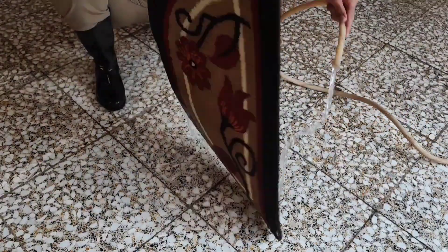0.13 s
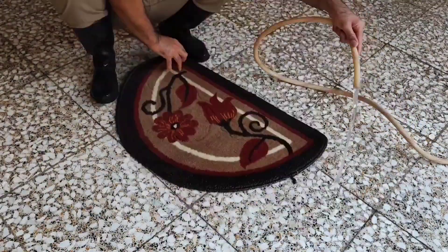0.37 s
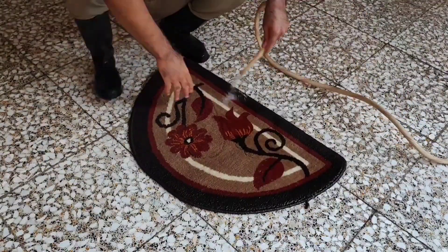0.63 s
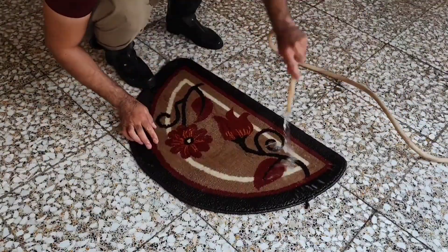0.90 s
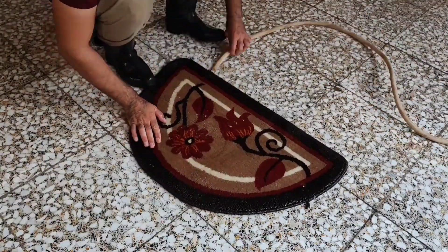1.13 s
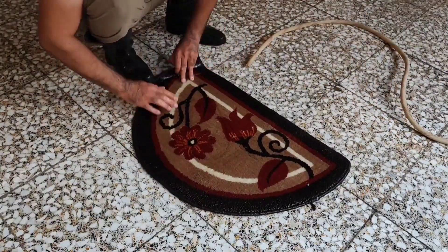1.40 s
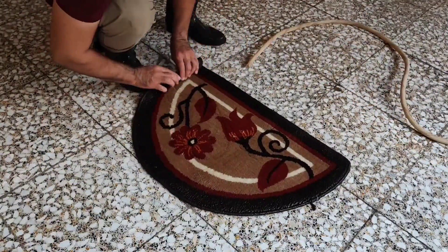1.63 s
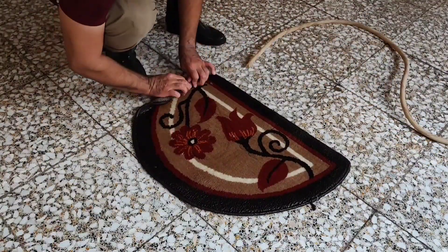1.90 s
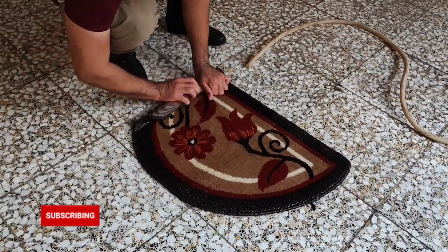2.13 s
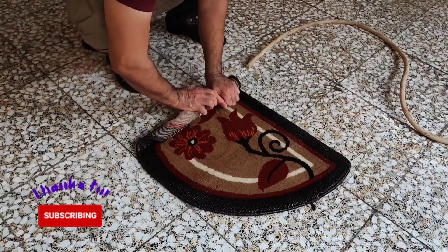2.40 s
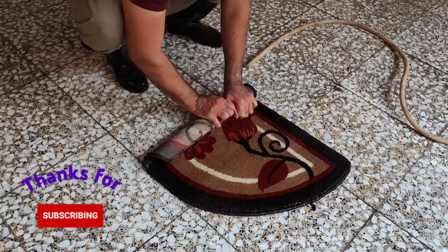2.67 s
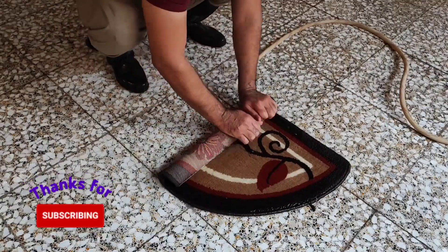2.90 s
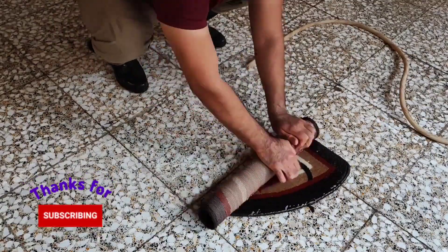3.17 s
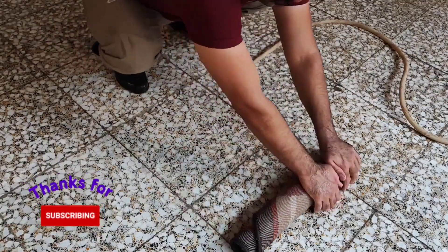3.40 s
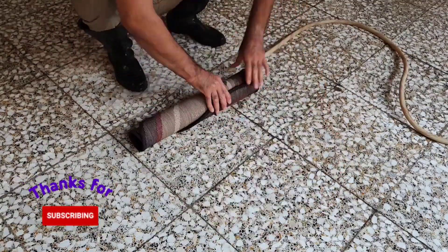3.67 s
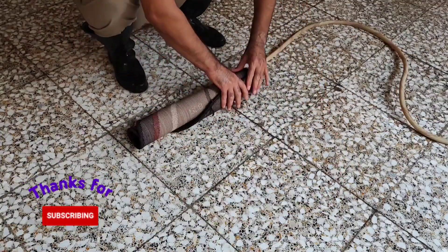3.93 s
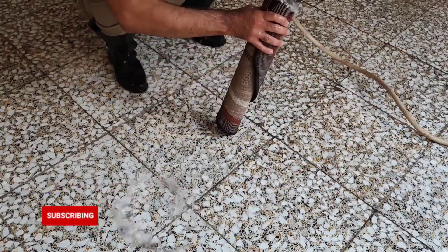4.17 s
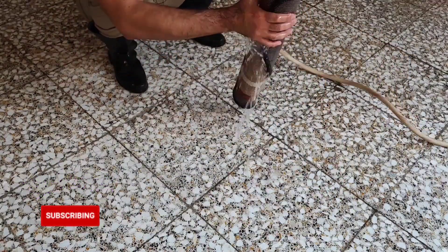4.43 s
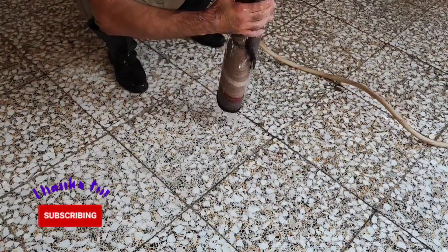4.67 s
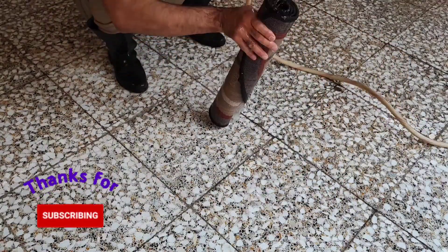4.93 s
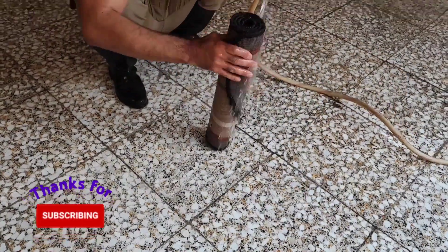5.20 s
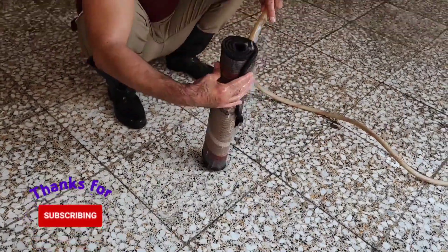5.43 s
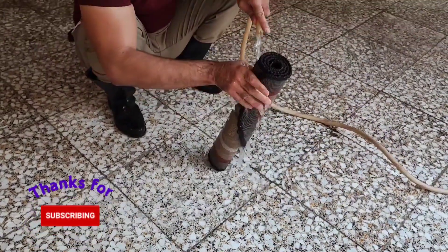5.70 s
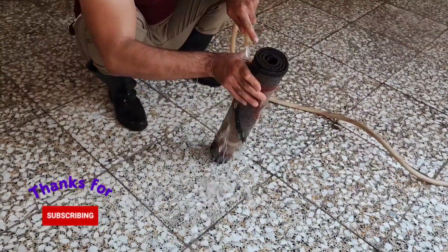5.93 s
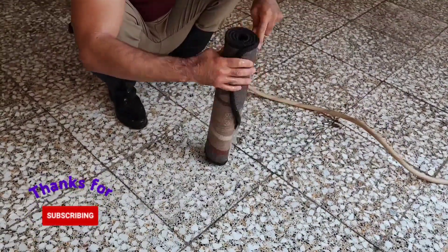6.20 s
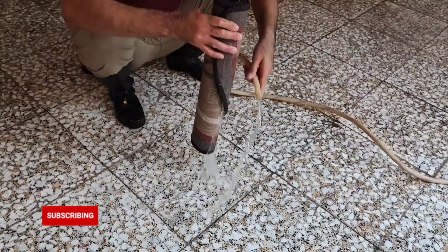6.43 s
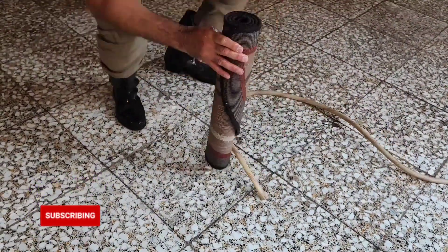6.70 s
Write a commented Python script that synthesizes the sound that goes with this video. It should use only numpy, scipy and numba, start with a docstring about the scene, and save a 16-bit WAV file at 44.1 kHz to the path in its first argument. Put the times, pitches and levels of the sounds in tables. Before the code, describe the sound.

A tiled yard, heard close through a phone-like stereo microphone, with a faint distant town rumble and a wavering low drone throughout. At 0.15 s a short splash of water hits the tile; at 0.3 s a soaked mat lands edge first and then flat, a loud, short, hollow wet slap with a crack, a quick spray and small flops until 0.4 s. Short dull wall echoes follow. Little splashes and drops fall near 0.6 and 1.0 s, with a few at 2 s. From 2 to 4 s it is quiet: faint trickle, tiny squishes, squeaks and a soft knock as the mat is rolled. From 4.1 s water returns in uneven spattering gushes, crisp plips and rising bubbles, busiest from 4.5 to 6.1 s. The roll is set down very softly around 4.85 s. Strong splashes come near 5.9 and 6.5 s, then sparse drips to the end.

```python
"""A soaked mat slaps down on a tiled yard floor under a weak hose; later, as a roll, it is softly set down.
The slap is a set of dying modes pushed by each contact, with wet cracks and a short spray of coloured noise.
Water is dense ringing droplets over fizz, played in gushes, with single drops, bubbles and noise bursts on top.
Delay lines give the yard walls; shaped noise and wavering sines give a distant town rumble with a low drone.
"""
import sys
import numpy as np
from scipy import signal
from scipy.fft import rfft, irfft, next_fast_len
from scipy.io import wavfile
from scipy.ndimage import uniform_filter1d
from numba import njit

SR = 44100
rng = np.random.default_rng(int(sys.argv[2]) if len(sys.argv) > 2 else 0)


def voltage_ratio(level):
    """Linear amplitude factor for a level in decibels (scalar or array-like)."""
    return 10 ** (np.asarray(level, float) / 20)


def output_pcm(signal):
    """Save a mono or channel-first signal as 16-bit PCM at the path in sys.argv[1].

    Samples are clipped to [-1, 1] before scaling.
    """
    pcm = np.clip(np.atleast_2d(signal).T, -1, 1) * 32767
    wavfile.write(sys.argv[1], SR, np.round(pcm).astype(np.int16))


N = 301203

# Spectrum of the distant town. Each row: frequency in Hz, relative density in dB per Hz.
TOWN_COLOUR = [(13, -37), (22, -7.5), (64, -5.5), (97, 0.5), (172, -3.5), (209, -7), (403, -9), (438, -8),
               (869, -14), (944, -16.5), (1390, -20.5), (1870, -22.5), (15500, -56.5)]
# Stereo likeness of the town. Each row: frequency in Hz, correlation of left and right from -1 to 1.
TOWN_LIKENESS = [(60, 0.91), (130, 0.98), (290, 0.75), (640, 0.33), (1410, -0.25), (3100, -0.0069),
                 (6820, -0.53), (15000, 0.58)]
# Swell of the rumble. Each row: time in seconds, level in dB, heard relative to its median.
TOWN_SWELL = [(0.0, -53), (0.36, -52.5), (0.68, -51.5), (1.08, -51.5), (2.04, -54), (3.86, -53),
              (4.26, -51), (4.43, -52.5), (4.68, -52), (4.87, -50), (5.32, -54), (6.41, -52.5), (6.83, -54)]
# Narrow bands of noise over the rumble, the highest a microphone resonance. Each row: centre in Hz,
# width in Hz, rms level in dB.
NOISE_BANDS = [(205.4, 41, -55.5), (442.5, 18, -61.5), (810, 38, -72), (1900, 540, -67.5), (7940, 700, -88)]
# Low drone that comes and goes. Each row: centre in seconds, half length in seconds, pitch in Hz,
# rms level at the centre in dB.
TOWN_DRONE = [(0.114, 0.085, 120, -44.5), (0.854, 0.081, 130.6, -46), (1.198, 0.09, 118.6, -45),
              (1.36, 0.049, 124.8, -47.5), (1.53, 0.091, 119, -44), (3.063, 0.039, 105, -52),
              (3.79, 0.073, 109.3, -48), (3.96, 0.053, 117, -46), (4.155, 0.089, 127.5, -47.5),
              (4.316, 0.054, 115, -49.5), (4.462, 0.055, 116.4, -46.5), (4.604, 0.1, 120, -51),
              (4.842, .05, 131, -51), (5.107, 0.059, 112, -51), (5.453, 0.037, 110.1, -47.5)]
# Spectrum of water on tile. Each row: frequency in Hz, relative density in dB per Hz.
WATER_SPECTRUM = [(530, -27), (900, -4.5), (1420, -9.5), (2450, -3.5), (3070, -3.5), (4180, -2.5),
                  (5500, -4), (7230, -10.5), (8650, -5.5), (11600, -17), (14100, -13), (15500, -17.5)]
# Water creeping and trickling over the tiles. Each row: time in seconds, rms level of the body in dB,
# fine spray relative to the body in dB.
TRICKLE_FLOW = [(0.0, -72, -6), (0.11, -78, -10), (0.2, -57, -8), (0.4, -66.5, -4), (0.74, -66, -1),
                (0.99, -60.5, 1.5), (1.12, -67, -9.5), (1.92, -66, -8), (3.51, -69.5, -8),
                (4.02, -69.5, -6), (4.2, -61.5, 2), (4.6, -61, 2), (4.75, -55.5, 1.5), (5.05, -61, -1),
                (5.24, -60.5, -1), (5.48, -66.5, 5), (5.7, -57.5, 0), (5.99, -63, 3), (6.11, -67, -5),
                (6.3, -59.5, -3), (6.7, -68, -11), (6.83, -63, -5)]
# Gushes hitting the tiles. Each row: peak in seconds, body level in dB, rise over 20 dB in seconds,
# fall over 20 dB in seconds, fine spray relative to the body in dB.
WATER_GUSHES = [(0.161, -41, .03, 0.06, -4), (0.295, -47, .02, .11, -10), (0.575, -62, .03, .12, 2.5),
                (0.675, -50, .02, .04, -14), (1.018, -49, .03, .03, -5), (1.045, -48, .025, .035, 0),
                (1.99, -55, .08, .08, -8), (0.51, -63, .01, .04, 3), (0.945, -60, .02, .03, 0),
                (3.64, -61.5, .06, .06, -7), (4.09, -62, .02, .1, -2), (4.175, -59, .02, .08, 3),
                (4.26, -56, .05, .05, 0), (4.44, -53, .025, .08, 2), (4.568, -49, .04, .025, -6),
                (4.66, -49, .04, .04, -9), (4.76, -52, .12, .06, -3), (4.875, -50, .1, 0.12, -3),
                (5.12, -58, .06, .04, -6), (5.27, -48, .05, .06, -5), (5.32, -51.5, .1, .17, 4),
                (5.6, -54, .08, .04, -2), (5.66, -49, .02, .04, -2), (5.715, -51, .03, .12, -1),
                (5.805, -52, .02, .08, 3), (5.925, -43, .05, .05, -5.5), (5.97, -56, .03, .02, 2),
                (6.04, -57, .02, .03, 1), (6.185, -57, .03, .11, 3), (6.31, -60, .02, .08, -3),
                (6.465, -43, .09, .12, -2), (6.755, -58, .03, .03, -16)]
# Single drops that stand out. Each row: start in seconds, nominal level in dB, starting pitch in Hz.
SINGLE_DROPS = [(0.1526, -33, 4990), (0.2059, -39, 4020), (0.5653, -44, 8010), (0.6695, -38, 2800),
                (1.016, -35, 3600), (1.035, -33, 4640), (1.9718, -37, 6680), (1.9926, -40, 2600),
                (2.082, -45.5, 3000), (2.293, -47, 2690), (3.2226, -44.5, 2640), (3.7694, -50, 3160),
                (4.1645, -31.5, 3990), (4.3186, -42, 3300), (4.4313, -38.5, 5750), (4.5272, -30, 4330),
                (4.5656, -28, 4500), (4.657, -32, 4900), (4.7394, -32, 4840), (4.8308, -29.5, 8250),
                (4.874, -27.5, 5130), (4.8988, -36, 4700), (4.94, -43, 3130), (4.987, -39, 8200),
                (5.03, -41, 5500), (5.0419, -33, 8900), (5.2006, -28, 8720), (5.2074, -36, 8840),
                (5.2412, -27, 9200), (5.2606, -34, 3250), (5.294, -33, 8550), (5.3672, -29, 9480),
                (5.3754, -35, 5500), (5.4665, -38.5, 5200), (5.573, -38, 4040), (5.6602, -31, 2710),
                (5.701, -32.5, 10100), (5.7195, -28.5, 5220), (5.7342, -33, 3330), (5.7963, -28.5, 5690),
                (5.8706, -40, 5520), (5.9113, -25.5, 8510), (5.921, -26, 4110), (5.929, -27, 3570),
                (5.9644, -33, 8840), (6.0074, -42, 3330), (6.0382, -30, 5200), (6.1754, -36, 8300),
                (6.2203, -33, 5440), (6.3025, -41, 5700), (6.4023, -39, 4300), (6.4388, -33, 4230),
                (6.4717, -33, 4000), (6.5256, -38.5, 3580), (6.636, -42.5, 3900), (6.7466, -41.5, 2570)]
# The mat lands edge first, then flat (fifth row), its corners flop after; later the roll is set down.
# Each row: start in seconds, thud peak before the bass cut in dB, contact decay in ms,
# share of the free ring time from 0 to 1, wet crack relative to the thud in dB.
MAT_CONTACTS = [(.2897, -11, .25, .12, -14), (.2917, -11, .15, .1, -14), (.2929, -11, .15, .1, -14),
                (.2952, -17, .1, .06, -8), (.2976, -2, .45, 1., -21), (.326, -28, .6, .6, -12),
                (.341, -27, .8, .7, -14), (.376, -34, .8, .6, -25), (4.825, -34, 1.5, .6, -40),
                (4.885, -33, 1.5, .8, -40)]
# Modes of wet mat and trapped air on tile. Each row: frequency in Hz, relative level in dB,
# free ring time to -60 dB in seconds.
MAT_MODES = [(258, -33, 0.14), (301, -18.5, 0.18), (376, 1, 0.094), (425, 1.5, 0.048), (513, 1, .04),
             (690, -9, 0.071), (743, -7, 0.035), (1110, -11, 0.042), (1460, -30, 0.036), (1810, -31, 0.036)]
# Spectrum of the wet crack. Each row: frequency in Hz, relative density in dB per Hz.
CRACK_SPECTRUM = [(530, -15), (900, -5), (1320, -14), (1550, -7.5), (2730, -16.5), (5750, -17),
                  (7230, -20.5), (8350, -17.5), (16000, -33.5)]
# Short bursts of band noise: gurgles, squeaks, faint high bursts, a knock and a dull thump.
# Each row: centre in seconds, half length in seconds, frequency in Hz, width in Hz,
# rms level at the centre in dB.
NOISE_BURSTS = [(1.292, 0.009, 10800, 5400, -57), (3.83, 0.0086, 11000, 5600, -61),
                (2.45, 0.2, 4740, 900, -71), (3.39, .02, 740, 80, -55), (2.33, .15, 2400, 1800, -63),
                (2.576, 0.0057, 2790, 200, -55), (2.85, 0.01, 5600, 200, -66),
                (3.21, 0.0055, 8100, 500, -60), (3.765, .015, 3180, 150, -61),
                (3.663, 0.018, 2000, 1200, -53.5), (4.69, 0.022, 1550, 200, -58),
                (5.272, 0.035, 2300, 500, -64), (5.667, 0.013, 2170, 640, -44),
                (5.923, 0.027, 2420, 150, -49.5), (6.45, 0.034, 4300, 500, -50),
                (4.19, .02, 4600, 1200, -56), (4.27, .015, 4200, 1200, -54), (4.55, .012, 4400, 900, -52),
                (4.87, .04, 340, 90, -50)]
# Larger bubbles that climb as they burst. Each row: start in seconds, nominal level in dB,
# starting pitch in Hz, decay in cycles, climb in octaves per decay time.
BURSTING_BUBBLES = [(4.757, -48, 3000, 12, 0.39), (4.997, -40, 2200, 4, 0.93),
                    (5.257, -44, 2000, 4.9, 0.59), (5.9357, -31, 2470, 6, 0.81), (6.0125, -52, 2900, 9, .5)]


def set_rms(x, db):
    """Scale to an rms level."""
    return x * voltage_ratio(db) / np.sqrt(np.mean(x ** 2))


def curve(rows):
    """Columns of a timed table, one value per sample."""
    s, *columns = np.transpose(rows)
    return [np.interp(np.arange(N) / SR, s, column) for column in columns]


def along(points, hz):
    """Read (Hz, value) points on a log-frequency axis."""
    f, value = np.transpose(points)
    return np.interp(np.log(np.maximum(hz, 1)), np.log(f), value)


def shape(x, gain):
    """Weight the spectrum by gain(Hz)."""
    size = next_fast_len(N)
    hz = np.arange(size // 2 + 1) * SR / size
    return irfft(rfft(x, size) * gain(hz), size)[..., :N]


def walk(rate):
    """Random levels held for 1 / rate seconds and slewed twice; spread near 1."""
    k = int(SR / rate)
    held = np.repeat(rng.standard_normal(N // k + 1), k)
    return 1.3 * uniform_filter1d(uniform_filter1d(held, k), k)[:N]


def bell(s, half):
    """A smooth swell around s."""
    return np.exp(-((np.arange(N) / SR - s) / half) ** 2)


def band(hz, width, channels):
    """Noise in one resonance, rms 1."""
    noise = rng.standard_normal((channels, N))
    return set_rms(shape(noise, lambda f: 1 / (1 + (2 * (f - hz) / width) ** 2)), 0)


@njit
def rings(start, hz, cycles, size, rise, n, sr):
    """Dying sines that swell over one period and climb rise octaves per decay (cycles = periods to 1 / e)."""
    out = np.zeros(n)
    for g in range(len(start)):
        life = cycles[g] * sr / hz[g]
        f, phase, climb = hz[g], 0., 2 ** (rise[g] / life)
        for i in range(int(5 * life) + 1):
            j = int(start[g]) + i
            if j >= n or f > .45 * sr:
                break
            phase += 2 * np.pi * f / sr
            f *= climb
            swell = min(i * hz[g] / sr, 1.)
            out[j] += size[g] * np.exp(-i / life) * swell * np.sin(phase)
    return out


def placed(s, hz, cycles, db, rise, pan_db, lag):
    """Rings on both microphones, each with its own balance and lag in samples."""
    def side(sign):
        start = np.maximum(s * SR + sign * lag / 2, 0)
        return rings(start, hz, cycles, voltage_ratio(db + sign * pan_db / 2), rise, N, 1. * SR)
    return np.array([side(0.97), side(-1)])


def town():
    """Distant rumble, alike on both sides in the bass, with narrow bands of noise and a wavering drone."""
    mid, side = rng.standard_normal((2, N))
    alike = lambda f: np.clip(along(TOWN_LIKENESS, f), -.9, .98)
    mid = shape(mid, lambda f: np.sqrt(1 + alike(f)))
    side = shape(side, lambda f: np.sqrt(1 - alike(f)))
    stereo = np.array([mid + side, mid - side])
    far = set_rms(shape(stereo, lambda f: voltage_ratio(along(TOWN_COLOUR, f))), -47.5)
    swell_db, = curve(TOWN_SWELL)
    # the swell carries the lows and mids; the treble only flickers
    low = shape(far, lambda f: 1 / (1 + (f / 1500) ** 2))
    treble = far - low
    out = treble * voltage_ratio(1.2 * walk(14)) + low * voltage_ratio(swell_db - np.median(swell_db))
    for hz, width, db in NOISE_BANDS:
        out = out + voltage_ratio(db) * band(hz, width, channels=1 + (hz > 1000))  # stereo above 1 kHz
    waver = 2 * np.pi * np.cumsum(4 * walk(22)) / SR  # pitch strays by about 4 Hz
    for s, half, hz, db in TOWN_DRONE:
        tone = np.sin(2 * np.pi * hz * np.arange(N) / SR + waver)
        out = out + np.sqrt(2) * voltage_ratio(db) * bell(s, half) * tone
    return out


def fizz(patchy_db, flicker_db):
    """Hiss whose bands flicker together and drift alone, so its colour keeps shifting."""
    patches = 0
    for hz in 1000 * 2 ** np.arange(0, 4.2, .5):
        patches = patches + np.sqrt(hz / 4000) * voltage_ratio(patchy_db * walk(45)) * band(hz, hz / 2.46, channels=2)
    return set_rms(patches * voltage_ratio(flicker_db * walk(70)), 0)


def flow():
    """Gains of body and fine spray: the trickle, with every gush swelling out of it and falling back."""
    roundness = 1.25  # 1 = pointed top, 2 = bell
    body_db, spray_db = curve(TRICKLE_FLOW)
    power = voltage_ratio([body_db, body_db + spray_db]) ** 2
    for s, db, rise_s, fall_s, fine_db in WATER_GUSHES:
        near = slice(max(int((s - 2 * rise_s) * SR), 0), int((s + 2 * fall_s) * SR))
        late = np.arange(N)[near] / SR - s
        below_db = 20 * np.maximum(late / fall_s, -late / rise_s) ** roundness
        power[:, near] += voltage_ratio(db - below_db + np.array([[0], [fine_db]])) ** 2
    return np.sqrt(power)


def spatter(count=12000, scatter_db=3.0, cap_db=14, fizz_db=1.5):
    """Dense droplets of a few cycles over fizz, played in gushes; body and fine spray move apart."""
    when, pitch, ring, size, pan, lag = rng.random((count, 6)).T
    hz = 1400 * 2 ** (3.4 * pitch)
    size_db = cap_db * np.tanh(-scatter_db * np.log(size) / cap_db)  # few are loud, none above the cap
    cycles = 1.47 + 8.66 * ring ** 3
    droplets = placed(when * N / SR, hz, cycles, size_db, 0.363 * ring, 8 * (pan - .5), 40 * (lag - .5))
    # octave-even droplets are lifted to a flat spectrum before colouring
    wet = set_rms(shape(droplets, lambda f: f / 4000), 0)
    wet = wet + voltage_ratio(fizz_db) * fizz(patchy_db=2.6, flicker_db=3.8)
    wet = shape(wet, lambda f: voltage_ratio(along(WATER_SPECTRUM, f)))
    body = shape(wet, lambda f: 1 / (1 + (f / 6000) ** 6))
    body_gain, spray_gain = flow()
    return body_gain * set_rms(body, 0) + spray_gain * set_rms(wet - body, 0)


@njit
def walls(x, lags, gain, damp):
    """Eight delay lines that feed each other, duller on every round."""
    line, soft, out = np.zeros((8, 8192)), np.zeros(8), np.zeros((2, len(x)))
    for i in range(len(x)):
        total = 0.
        for k in range(8):
            soft[k] += (1 - damp) * (gain[k] * line[k, (i - lags[k]) & 8191] - soft[k])
            total += soft[k]
            out[k % 2, i] += soft[k]
        for k in range(8):
            line[k, i & 8191] = x[i] + soft[k] - total / 4
    return out


def yard(near):
    """Yard walls: echoes of the near sounds, thickening and dulling as they die."""
    lags = np.array([611, 787, 953, 1187, 1433, 1601, 1889, 2113])  # samples
    t60_s = 0.28  # before the damping shortens it
    return voltage_ratio(-18.5) * walls(near.mean(axis=0), lags, voltage_ratio(-60 * lags / SR / t60_s), 0.49)


def drops(splash_s=0.0039, splash_db=-19, tick_db=4.5, tick_db_per_octave=4.0):
    """Single drops: a sharp tick (stronger from higher drops), a bubble climbing in pitch, a brief splash."""
    s, db, hz = np.transpose(SINGLE_DROPS)
    spread = np.array([[6], [30], [1.5], [8]])  # dB, samples, cycles, dB
    pan_db, lag, ring, wet_db = (rng.random((len(s), 4)).T - .5) * spread
    cycles = np.maximum(4.2 + ring, .5)
    bubble = placed(s, hz, cycles, db, 0 * hz + 0.297, pan_db - 1.5, lag)
    ticks_db = db + tick_db + tick_db_per_octave * np.log2(hz / 5000)
    tick = placed(s, 0 * hz + 11000, 0 * hz + 0.99, ticks_db, 0 * hz, pan_db, lag)
    starts = np.zeros(N)
    starts[(s * SR).astype(int)] = voltage_ratio(db + splash_db + wet_db)
    splash = signal.lfilter([1], [1, -np.exp(-1 / (splash_s * SR))], starts)
    colour = lambda f: voltage_ratio(along(WATER_SPECTRUM, f)) * np.sqrt(f)
    hiss = set_rms(shape(rng.standard_normal((2, N)), colour), 0)
    return bubble + tick + splash * hiss


def slap(crack_t60_s=0.022, spray_db=-29.5, spray_t60_s=0.14):
    """Each contact pushes the mat's modes and cracks wetly; the flat landing throws out a short spray."""
    thud, crack = np.zeros((2, N))
    hz, db, t60 = np.transpose(MAT_MODES)[:, :, None]
    t = np.arange(SR // 4) / SR
    for s, peak_db, contact_ms, ring, crack_db in MAT_CONTACTS:
        i = int(s * SR)
        decay = np.exp(-np.log(1000) * t / (t60 * ring))
        body = (voltage_ratio(db) * decay * np.sin(2 * np.pi * hz * t)).sum(axis=0)
        # a longer contact pushes more softly and dulls the thud
        body = np.convolve(body, np.exp(-t[:400] * 1000 / contact_ms))[:len(t)]
        thud[i:i + len(t)] += voltage_ratio(peak_db) * body / np.abs(body).max()
        crack[i:i + len(t)] += voltage_ratio(peak_db + crack_db) * np.exp(-np.log(1000) * t / crack_t60_s)
    i = int(MAT_CONTACTS[4][0] * SR)  # flat landing
    crack[i:i + len(t)] += voltage_ratio(spray_db) * np.exp(-np.log(1000) * t / spray_t60_s)
    hiss = set_rms(shape(rng.standard_normal((2, N)), lambda f: voltage_ratio(along(CRACK_SPECTRUM, f))), 0)
    # the microphone passes little deep bass
    bass_cut = signal.butter(3, 218, "high", fs=SR, output="sos")
    return signal.sosfilt(bass_cut, thud) + hiss * crack


def noise_bursts():
    """Short bursts of band noise: gurgles, squeaks, faint high bursts, a knock and a dull thump."""
    return sum(voltage_ratio(db) * bell(s, half) * band(hz, width, channels=2)
               for s, half, hz, width, db in NOISE_BURSTS)


def bubbles():
    """Air caught under the stream: short rings that climb in pitch."""
    s, db, hz, cycles, rise = np.transpose(BURSTING_BUBBLES)
    return placed(s, hz, cycles, db, rise, 0 * s - 2, 0 * s + 3)


def scene():
    """Near sounds with the yard walls behind them, over the town."""
    near = spatter() + drops() + slap() + noise_bursts() + bubbles()
    return near + yard(near) + town()


def low_pass(x):
    """Removes everything above the highest recorded frequency."""
    return signal.sosfilt(signal.butter(12, 16670, fs=SR, output="sos"), x)


def record(dry):
    """A phone microphone pair with faint self-noise and a steep fall above 15.8 kHz."""
    noisy = dry + voltage_ratio(-75) * rng.standard_normal(dry.shape)
    mix = shape(noisy, lambda f: 1 / (1 + (f / 15800) ** 60) + 0.026)  # a trace of the very top leaks through
    return low_pass(mix)


dry = scene()
out = record(dry)
output_pcm(out)
```